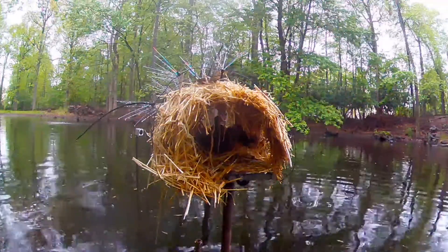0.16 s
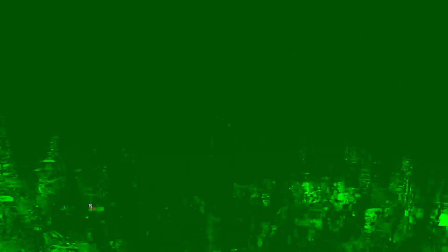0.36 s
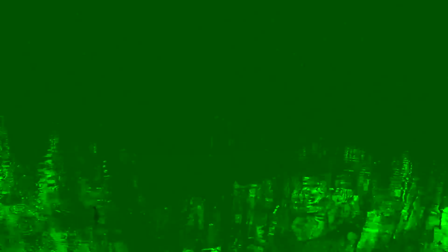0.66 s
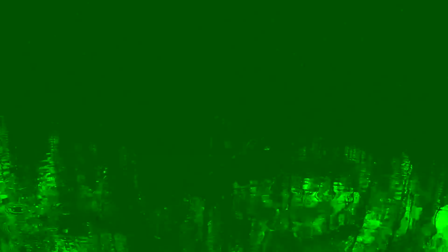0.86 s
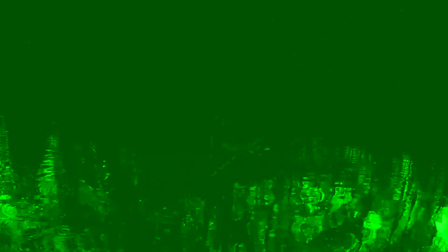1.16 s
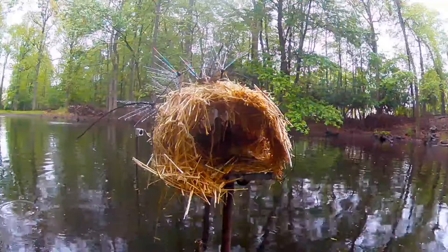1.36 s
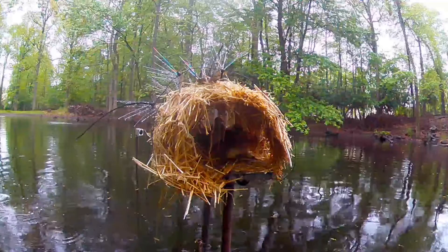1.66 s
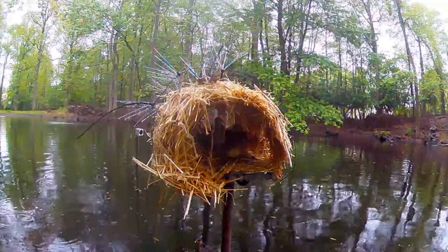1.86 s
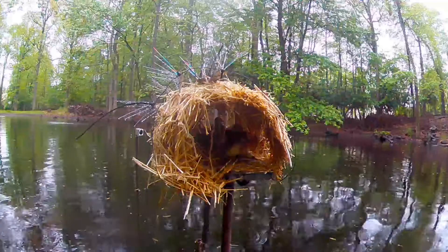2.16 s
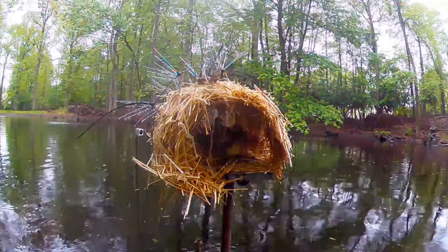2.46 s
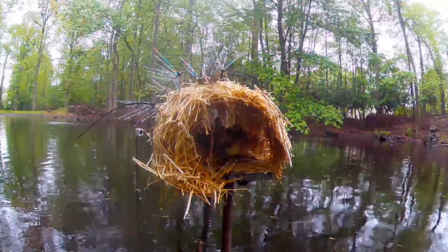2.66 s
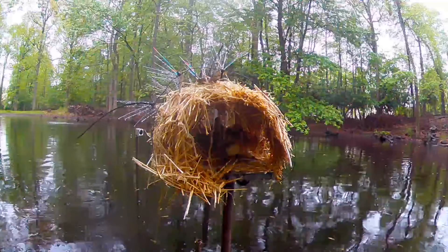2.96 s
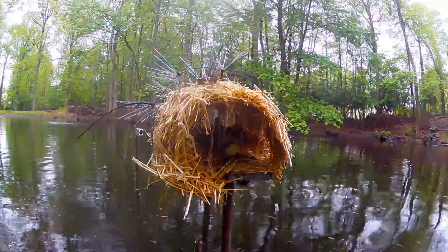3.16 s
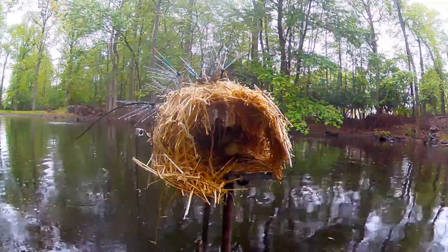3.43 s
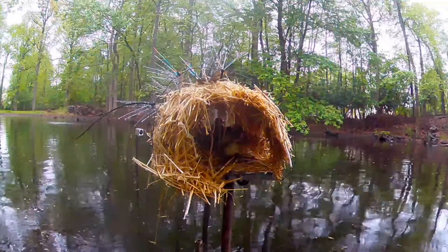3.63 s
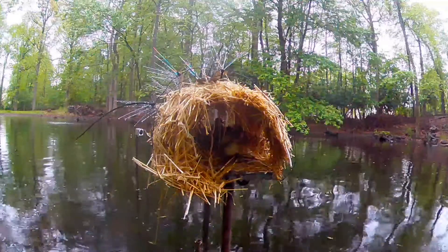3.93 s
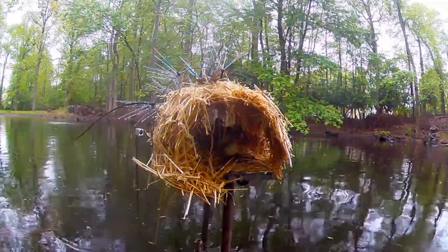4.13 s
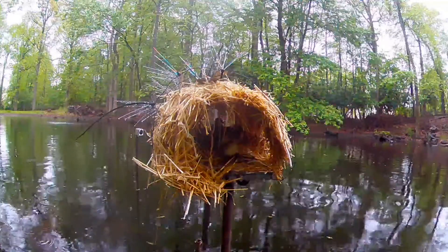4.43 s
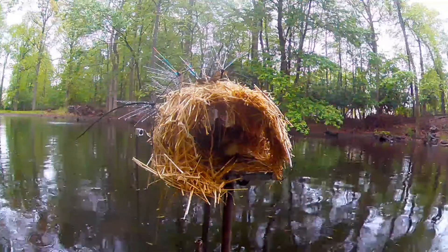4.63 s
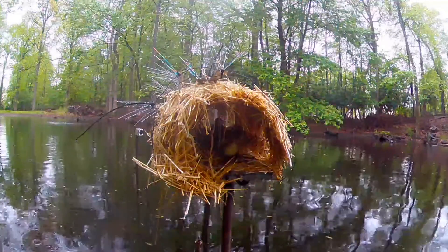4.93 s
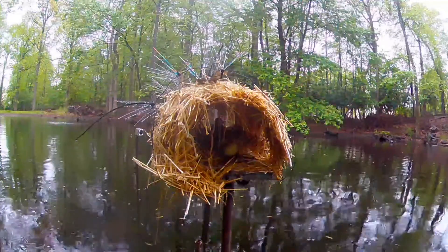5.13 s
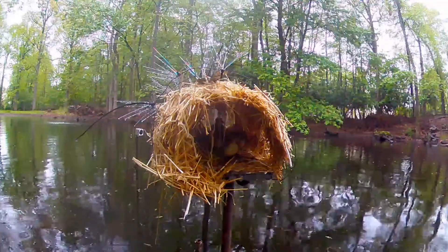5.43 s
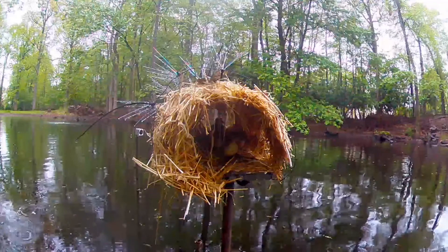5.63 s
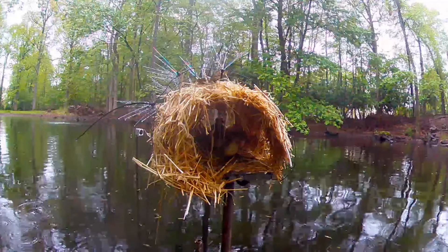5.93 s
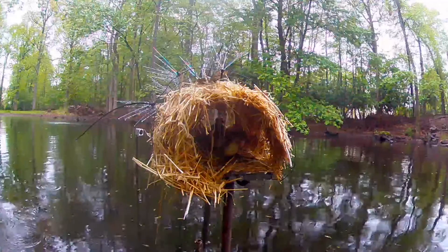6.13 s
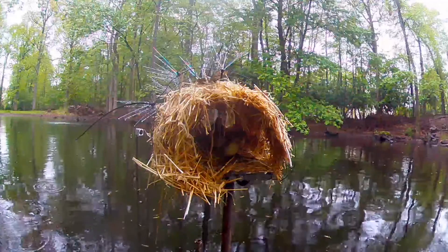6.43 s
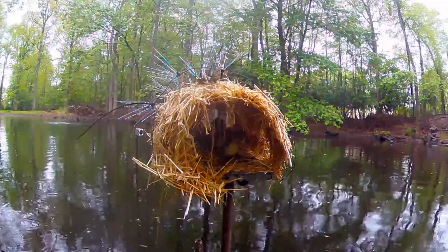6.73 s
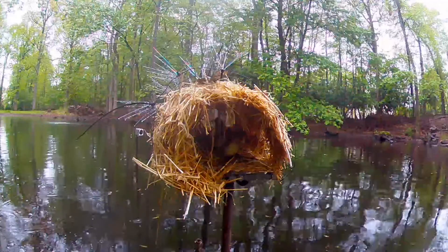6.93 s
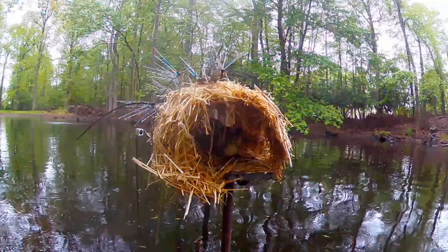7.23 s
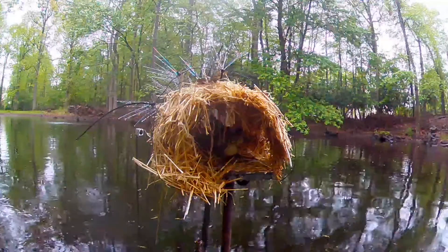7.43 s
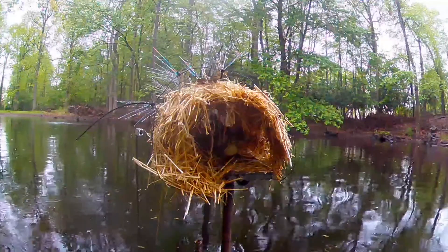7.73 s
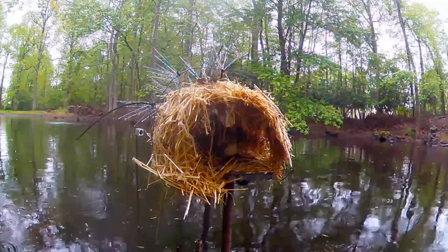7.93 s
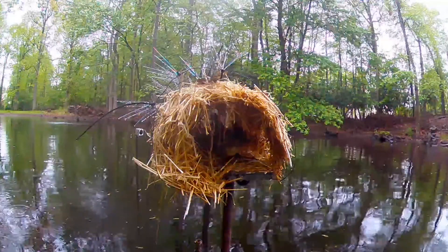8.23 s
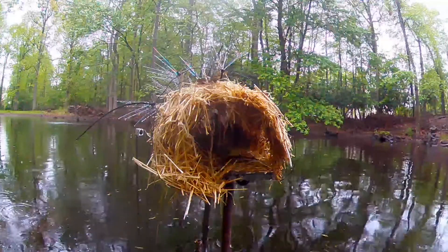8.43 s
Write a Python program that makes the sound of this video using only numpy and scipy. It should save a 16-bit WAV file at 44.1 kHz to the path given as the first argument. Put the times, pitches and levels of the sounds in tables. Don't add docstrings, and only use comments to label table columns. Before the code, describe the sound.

A steady quiet bed of woodland hiss and a faint low hum near 150 Hz, beating slowly, lasts about 8.5 seconds. Faint peeps open the scene with a weak distant hen rasp; from 0.5 seconds bright duckling whistles near 4.7 kHz arrive several times a second, each under a tenth of a second, scooping upward, some cracking into short breathy rattles. The hen rasps softly around 1.6 to 2.1. Quick blips cluster at 3.2 to 3.7 and 4.0 to 4.5, where dry, pulsed hen rasps answer until 4.9. Peeps thin out, with a brief stronger group near 6.0, then softer notes around 4.1 kHz at 6.4, 6.7, 7.0 and 7.3. Faint peeps and hen rasps at 6.8 and 7.8 to 8.45 finish. Throughout, 20-millisecond repeats cause stutters, splices and clicks; treble is dull above 7 kHz, with thin echo from trees.

```python
import sys
import numpy as np
from scipy import signal
from scipy.io import wavfile
from scipy.ndimage import uniform_filter1d

SR = 44100
rng = np.random.default_rng(int(sys.argv[2]) if len(sys.argv) > 2 else 0)


def transcribe(signal):
    frames = np.atleast_2d(signal).T
    limited = np.clip(frames, -1, 1)
    pcm = np.round(limited * 32767).astype(np.int16)
    wavfile.write(sys.argv[1], SR, pcm)


def volts_from_decibels(level):
    exponent = np.asarray(level, float) / 20
    return 10 ** exponent


N = 378378

# frequency in Hz, level in dB rms.
HUM_TONES = [(149.77, -69.5), (148.71, -74), (300, -84)]
HUM_IN_STEP_S = 4.1
# frequency in Hz, density in dB per Hz.
WOODS_SPECTRUM = [(15, -47), (25, -11.5), (96, -7.5), (152, -4), (224, -10.5), (371, -8.5), (1020, -19),
                  (1540, -17), (2150, -12.5), (3320, -16), (4650, -14.5), (6670, -19), (7900, -23),
                  (10300, -64.5), (17400, -120)]
WOODS_LEVEL_DB = -64

# start in seconds, length in seconds, first level in dB, last level in dB.
RASPS = [(0, .1, -60, -72), (.24, .12, -67, -77), (1.6, .2, -63, -58), (1.77, .18, -60, -61),
         (1.92, .22, -63, -66), (4.11, .25, -56, -59), (4.37, .14, -48, -54), (4.515, .135, -57, -55.5),
         (4.775, .11, -52, -60), (6.755, .17, -50.5, -48), (7.788, .21, -55, -52),
         (8.045, .155, -51, -51.5), (8.29, .16, -50.5, -48.5)]
# frequency in Hz, width in Hz, level in dB.
THROAT_MODES = [(2157, 240, 5), (2380, 260, -7), (2620, 1200, -17), (1998, 490, -13), (5830, 1100, -20)]
RASP_ATTACK_S, RASP_RELEASE_S, RASP_EDGE_DB = .022, .05, 22

# start in seconds, length in seconds, level in
# dB.
RATTLES = [(3.2205, .002, -41), (6.106, .003, -46), (5.536, .002, -45), (5.5445, .002, -49),
           (5.556, .002, -50), (1.488, .016, -47), (2.906, .008, -50), (.882, .05, -47), (1.128, .035, -45),
           (1.466, .03, -48), (2.03, .025, -46), (2.356, .02, -48), (2.68, .05, -46), (2.99, .06, -44),
           (3.302, .035, -46), (3.665, .02, -48), (3.995, .01, -50), (4.082, .04, -45), (4.466, .06, -47),
           (5.695, .025, -52), (6.066, .025, -54), (6.462, .03, -52), (6.77, .02, -51), (7.405, .03, -55),
           (7.78, .025, -52), (.5, .02, -50)]
RATTLE_HZ, RATTLE_SAG_HZ, RATTLE_WIDTH_HZ, RATTLE_FADE_DB = 5200, 1100, 1300, 8

# start in seconds, length in seconds, first pitch in Hz, last pitch in Hz, level in dB.
HELD_PEEPS = [(.512, .075, 4540, 4575, -30.5), (.516, .074, 4850, 4770, -39), (.79, .089, 4600, 4690, -29),
              (.795, .045, 4890, 4800, -40), (2.278, .034, 4935, 4935, -48), (5.996, .048, 4650, 4650, -33),
              (6.045, .025, 4650, 4650, -33), (1.05, .075, 4660, 4650, -32), (1.058, .048, 4810, 4800, -35),
              (1.128, .03, 4830, 4750, -45), (1.307, .102, 4820, 4650, -34), (1.408, .05, 4860, 4860, -33),
              (1.572, .099, 4800, 4600, -32), (1.857, .09, 4800, 4600, -33), (1.945, .089, 4700, 4740, -39),
              (2.136, .091, 4790, 4640, -33), (2.27, .042, 4680, 4710, -33), (2.588, .054, 4660, 4700, -33),
              (2.628, .05, 4750, 4850, -43), (2.922, .074, 4780, 4900, -33), (3.584, .078, 4760, 4800, -42),
              (4.412, .045, 4700, 4750, -43), (5.642, .048, 4760, 4750, -40),
              (6.108, .072, 4070, 3970, -44)]
# start in seconds, length in seconds, first pitch in Hz, last pitch in Hz, level in dB.
BURST_PEEPS = [(2.362, .02, 4800, 4750, -41), (3.203, .025, 4350, 4400, -43), (5.074, .07, 4230, 4420, -41),
               (5.376, .05, 4620, 4540, -38), (6.383, .094, 4130, 4030, -41),
               (6.689, .1, 4130, 4050, -41.5), (7.002, .1, 4170, 4070, -41.5),
               (7.313, .1, 4060, 4220, -43.5), (7.463, .027, 4580, 4580, -51)]
# start in seconds, length in seconds, first pitch in Hz, last pitch in Hz, level in dB.
SWELL_PEEPS = [(.305, .042, 3960, 4000, -47), (5.413, .046, 4560, 4680, -36),
               (2.82, .065, 5150, 5090, -51.5), (3.243, .055, 4670, 4750, -40)]
# start in seconds, length in seconds,
# first pitch in Hz, last pitch in Hz, level in dB.
FAINT_PEEPS = [(7.968, .072, 4250, 4080, -53), (3.69, .05, 4780, 4750, -55), (3.36, .06, 4850, 4800, -60),
               (.058, .045, 3800, 3680, -55), (.185, .045, 3350, 3250, -62), (.245, .055, 4430, 4350, -52),
               (.41, .1, 5020, 4980, -57), (.695, .03, 5450, 5100, -56), (.745, .055, 5020, 4950, -52),
               (1.041, .014, 4700, 4700, -42), (2.543, .057, 5080, 5100, -50),
               (3.185, .058, 5090, 5080, -49), (2.308, .044, 4750, 4780, -46), (4.12, .14, 4780, 4770, -61),
               (4.29, .09, 5180, 5100, -60), (4.31, .053, 4160, 4160, -61), (4.625, .11, 5110, 5060, -57),
               (4.78, .055, 3700, 3480, -54), (4.928, .02, 5300, 5150, -65),
               (5.807, .065, 4150, 3760, -55.5), (5.87, .06, 3750, 3750, -58), (5.69, .04, 4750, 4840, -55),
               (7.342, .048, 4770, 4720, -50), (7.6, .05, 4400, 4150, -54), (7.597, .06, 4900, 4600, -51),
               (7.659, .065, 4320, 4160, -48), (7.737, .047, 4800, 4790, -45),
               (7.857, .063, 4700, 4730, -51), (7.865, .09, 6300, 6100, -66), (4.73, .06, 5080, 5080, -63),
               (8.095, .14, 4880, 4900, -56), (4.038, .027, 4780, 4760, -51), (8.357, .06, 4790, 4740, -46),
               (8.43, .075, 4780, 4750, -57), (8.445, .055, 3900, 3900, -64)]
# start in seconds, length in seconds, first pitch in Hz, last pitch in Hz, level in dB.
SLIDES = [(.044, .012, 4250, 4000, -57), (.352, .009, 4250, 4350, -47), (.504, .012, 4030, 4030, -49),
          (1.671, .009, 4700, 3700, -50), (2.052, .012, 4400, 3650, -48), (2.127, .006, 3900, 4700, -54),
          (2.229, .008, 4800, 3800, -52), (3.298, .01, 4900, 4300, -42), (3.331, .011, 4700, 3800, -43),
          (4.085, .008, 4600, 4100, -49), (4.108, .016, 4600, 3700, -55), (2.9, .005, 4640, 4640, -33),
          (6.462, .016, 3950, 3850, -47), (6.768, .016, 4100, 3800, -48), (.312, .022, 3850, 3500, -53),
          (8.04, .016, 4080, 3850, -52), (4.75, .037, 4700, 3750, -60), (5.04, .035, 5050, 4500, -60),
          (5.05, .028, 3980, 4200, -57), (5.366, .012, 5300, 4900, -59), (6.37, .01, 4000, 4300, -57),
          (5.615, .015, 5220, 4800, -48)]
# start in seconds, length in seconds, first pitch in Hz, last pitch in Hz, level in dB.
BLIPS = [(7.964, .045, 4260, 4200, -47), (2.682, .01, 4650, 4600, -41), (3.011, .014, 4600, 4000, -39),
         (2.031, .012, 4750, 4550, -40), (6.09, .016, 4070, 4050, -43), (2.35, .015, 4900, 4850, -34),
         (2.671, .011, 4930, 4880, -35), (3.288, .016, 4880, 4950, -32), (3.3, .007, 4750, 4600, -38),
         (3.59, .009, 4660, 4700, -37), (3.659, .007, 4850, 4850, -31), (4.001, .01, 4500, 4720, -36),
         (4.012, .016, 4800, 4780, -37.5), (4.028, .012, 4780, 4770, -43), (4.067, .009, 4780, 4800, -40),
         (4.075, .008, 4900, 4900, -32), (4.082, .006, 4720, 4600, -36), (4.383, .038, 4680, 4680, -29.5),
         (4.453, .009, 4950, 4950, -32), (4.461, .007, 4750, 4500, -33), (1.455, .016, 4830, 4850, -33),
         (7.082, .02, 4350, 4250, -47), (7.101, .012, 4350, 4200, -43), (7.83, .013, 4800, 4800, -49),
         (1.148, .009, 4850, 4750, -38), (1.157, .006, 4600, 4300, -43), (5.625, .024, 4800, 4780, -39),
         (7.718, .01, 4350, 4200, -48), (6.066, .007, 4700, 4500, -47), (1.465, .007, 4700, 4500, -37)]
# attack in seconds, rise in dB, scoop in Hz, change over the hold in dB,
# release in seconds, fall in dB. Attack and release squeeze to fit short peeps.
HELD_SHAPE = (.014, 10, 150, -.3, .018, 14)
BURST_SHAPE = (.006, 16, 80, -4, .022, 14)
SWELL_SHAPE = (.008, 5, 30, 7, .022, 14)
FAINT_SHAPE = (.006, 2.5, 5, -3, .015, 3)
SLIDE_SHAPE = (.001, 1.2, 5, -2.5, .001, 1.2)
BLIP_SHAPE = (1, 13, 40, 0, 1, 13)

BLOCK_S, FIRST_BLOCK_S, TURN_SAMPLES, TURN_BLOCKS = .0005, .00023, 882, 40
# valid from in seconds, block of 40 where a turn begins.
TURN_STARTS = [(0, 27), (.37, 22), (5.53, 14)]
# start in seconds, count of blocks, count of turns.
STUCK_BLOCKS = [(.8852, 1, 6), (.9332, 8, 4), (1.1712, 20, 2), (2.7252, 1, 4), (4.4852, 1, 6),
                (5.4852, 1, 3), (6.0812, 1, 3), (1.5057, 1, 1), (1.4917, 3, 1), (1.5112, 18, 1),
                (5.1652, 1, 1), (7.3272, 1, 1)]
# start in seconds, length in ms.
STALLS = [(.3327, 11), (.5252, 36), (.5852, 36), (1.0452, 25.5), (1.3052, 16), (1.3512, 39.5), (1.9512, 10),
          (2.0712, 9), (2.1452, 16), (2.1912, 19.5), (2.3052, 25.5), (2.5852, 16), (2.6312, 39.5),
          (2.8912, 10), (2.9512, 39.5), (3.0252, 16), (3.2112, 29.5), (3.6112, 19.5), (4.3652, 15.5),
          (4.4312, 10), (5.0857, 15.5), (5.1252, 36), (5.9712, 26), (5.3912, 30), (5.4512, 30),
          (5.6472, 19.5), (6.0272, 30), (6.1072, 10), (1.5712, 10), (6.1612, 25.5), (6.4072, 30),
          (6.7272, 39.5), (7.0472, 41), (7.3672, 39.5), (7.6272, 30), (7.7672, 14), (7.6872, 10),
          (7.7072, 19.5), (7.8872, 10), (7.9072, 10), (8.0412, 6), (8.0872, 10), (4.9512, 30)]
# start in seconds, length in ms.
SETTING_IN = [(.7712, 39.5), (.8307, 50.5), (1.0912, 39.5), (1.4107, 30.5), (1.9917, 19.5), (2.3687, 41),
              (2.6912, 28), (3.2712, 19.5), (3.6512, 37.5), (6.4672, 39.5), (6.7872, 38), (6.8612, 36),
              (6.6712, 26), (6.9912, 26), (7.3112, 26), (8.3357, 29), (8.3872, 39.5)]
# start in seconds, length in ms.
RAGGED = [(.5142, 4), (1.1512, 10), (2.4317, 8.5), (2.7252, 7), (3.0452, 5.5), (4.5112, 9), (4.5522, 38.5),
          (4.6112, 9.5), (5.5127, 5.5), (5.6017, 15), (6.2072, 8.5), (7.1072, 40), (7.8272, 10),
          (7.8472, 10), (8.1272, 50), (8.4472, 8)]
SET_IN_MS, OLD_SHARE = 10, .7
# start in seconds, length in ms.
PATCHY_RUNS = [(0.5062, 1.0), (0.5112, 1.5), (0.5142, 1.5), (0.5167, 2.0), (0.5192, 0.5), (0.5252, 3.5),
               (0.5457, 5.0), (0.5517, 3.5), (0.5557, 5.5), (0.5857, 0.5), (0.6052, 3.5), (0.8057, 4.5),
               (1.1052, 3.5), (1.3452, 1.0), (0.8312, 2.0), (0.8337, 0.5), (0.8347, 0.5), (0.8357, 0.5),
               (0.8377, 0.5), (0.8452, 4.5), (0.8502, 0.5), (0.8652, 4.5), (0.8702, 0.5), (1.0657, 4.0),
               (1.0702, 0.5), (1.0912, 3.5), (1.0957, 1.0), (1.0977, 1.5), (1.0997, 0.5), (1.1112, 3.5),
               (1.1157, 5.5), (1.1522, 1.0), (1.1562, 0.5), (1.1597, 0.5), (1.1652, 1.5), (1.3652, 4.5),
               (1.4112, 1.5), (1.4137, 0.5), (1.4147, 1.5), (1.4177, 0.5), (1.4257, 5.0), (1.4452, 3.5),
               (1.4497, 1.0), (1.4717, 1.5), (1.4852, 1.0), (1.9852, 1.0), (1.9917, 3.5),
               (1.9957, 1.5), (1.9977, 0.5), (1.9987, 1.0), (2.1517, 0.5), (2.1527, 8.5), (2.1857, 0.5),
                 (2.3052, 1.0), (2.3252, 1.0), (2.3687, 1.0), (2.3712, 2.5), (2.3742, 1.0), (2.3762, 0.5),
                 (2.3772, 1.0), (2.3787, 1.5), (2.3852, 5.0), (2.4052, 4.5), (2.6252, 1.0), (2.6452, 4.5),
                 (2.6502, 0.5), (2.6917, 1.0), (2.6962, 1.5), (2.6982, 1.0), (2.7252, 4.5), (2.7302, 0.5),
                 (2.9057, 5.0), (2.9452, 1.0), (2.9852, 4.5), (2.9902, 0.5), (3.0052, 0.5), (3.0117, 0.5),
                 (3.0127, 0.5), (3.0252, 4.0), (3.0297, 1.0), (3.2052, 0.5), (3.2067, 0.5), (3.2252, 4.5),
                 (3.2302, 1.0), (3.2712, 3.0), (3.2747, 1.0), (3.2772, 0.5), (3.2782, 1.0), (3.2797, 0.5),
                 (3.6257, 5.0), (3.6462, 4.5), (3.6512, 2.0), (3.6547, 0.5), (3.6557, 0.5), (3.6577, 0.5),
               (3.6602, 0.5), (3.6657, 5.0), (3.6857, 3.0), (4.4252, 1.0), (5.1142, 0.5), (5.3857, 0.5),
               (5.4452, 0.5), (5.6612, 4.5), (6.0212, 0.5), (5.6662, 0.5), (6.0412, 4.5), (6.0462, 0.5),
               (6.0812, 0.5), (6.0852, 1.0), (6.1212, 3.5), (6.1612, 4.5), (6.1662, 0.5), (6.4012, 1.0),
               (6.4052, 0.5), (6.4217, 5.0), (6.4417, 3.0), (6.4467, 0.5), (6.4617, 0.5), (6.4672, 1.5),
               (6.4697, 1.0), (6.4732, 2.0), (6.4757, 0.5), (6.7172, 1.5), (6.7212, 1.0), (6.8612, 1.0),
               (7.0417, 0.5), (7.0617, 5.0), (7.0872, 1.0), (7.0932, 0.5), (7.1072, 4.0), (7.1117, 1.0),
               (7.1142, 2.0), (7.3612, 1.0), (8.3872, 2.5), (8.3902, 2.5), (8.3947, 1.5), (8.4012, 4.5),
               (8.4062, 0.5)]
# start in seconds, end in seconds.
SOUND_SPANS = [(2.085, 2.14), (4.6, 4.74), (4.985, 5.04), (5.53, 5.6), (.115, .18), (.24, .33),
               (4.845, 4.95), (4.28, 4.36), (1.525, 1.56), (.36, .42), (.62, .7), (1.0, 1.04), (1.2, 1.3),
               (2.79, 2.82), (1.59, 1.94), (2.22, 2.3), (3.3, 3.6), (3.89, 3.99), (4.13, 4.24),
               (4.74, 4.82), (5.17, 5.22), (5.7, 5.87), (3.16, 3.2), (7.79, 7.83), (6.3, 6.4), (7.42, 7.55),
               (7.59, 7.62), (7.7, 7.76), (7.93, 8.07), (8.2, 8.33)]


def evened(x):
    return x / np.sqrt(np.mean(x ** 2) + 1e-20)


def add(mix, start_s, sound):
    part = mix[max(round(start_s * SR), 0):][:len(sound)]
    part += sound[:len(part)]


def drift(size, width):
    chance = rng.standard_normal(8192 * (size // 8192 + 1))
    smooth = uniform_filter1d(uniform_filter1d(chance, width), width)
    return evened(smooth)[:size]


def ring(x, hz, width_hz):
    radius = np.exp(-np.pi * width_hz / SR)
    pole = radius * np.exp(2j * np.pi * hz / SR)
    return 2 * signal.lfilter([1 - radius], [1, -pole], x).real


def hum():
    t = np.arange(N) / SR - HUM_IN_STEP_S
    return sum(np.sqrt(2) * volts_from_decibels(db) * np.cos(2 * np.pi * hz * t) for hz, db in HUM_TONES)


def woods():
    frames = N // 256 + 5
    hz = np.fft.rfftfreq(1024, 1 / SR)
    real, imag, patches = rng.standard_normal((frames, 513, 3)).T
    patches = uniform_filter1d(patches, 10, axis=0)
    patches = evened(uniform_filter1d(patches, 16, axis=1))
    table_hz, table_db = np.transpose(WOODS_SPECTRUM)
    colour_db = np.interp(np.log(hz + 1), np.log(table_hz + 1), table_db)[:, None]
    level_db = colour_db + 1.5 * patches + 1.1 * drift(frames, 40)
    spectra = (real + 1j * imag) * volts_from_decibels(level_db)
    hiss = signal.istft(spectra, nperseg=1024, noverlap=768)[1][:N]
    return volts_from_decibels(WOODS_LEVEL_DB) * evened(hiss)


def trees(x):
    t60_s, gap_s = .8, .02
    t = np.arange(SR) / SR
    scatter = rng.standard_normal(SR) * (rng.random(SR) < .05)
    tail = scatter * volts_from_decibels(-60 * t / t60_s) * (t > gap_s)
    return signal.fftconvolve(x, tail / np.linalg.norm(tail))[:N]


def rasp(start_s, length_s, first_db, last_db):
    pulse_hz, jitter = 180, .15
    corner_s = [0, RASP_ATTACK_S, length_s - RASP_RELEASE_S, length_s]
    corner_db = [first_db - RASP_EDGE_DB, first_db, last_db, last_db - RASP_EDGE_DB]
    t = np.arange(0, length_s, 1 / SR)
    size, breath = rng.standard_normal((2, SR))[:, :len(t)]
    cycles = np.cumsum(pulse_hz * (1 + jitter * drift(len(t), 150))) / SR
    pulses = np.diff(np.floor(cycles), prepend=0) * volts_from_decibels(1.6 * size)
    drive = evened(pulses) + .45 * breath
    throat = sum(volts_from_decibels(db) * ring(ring(drive, hz, width), hz, 2 * width) for hz, width, db in THROAT_MODES)
    level = volts_from_decibels(np.interp(t, corner_s, corner_db))
    return start_s, level * evened(throat) * signal.windows.tukey(len(t), .08)


def rattle(start_s, length_s, db):
    t = np.arange(0, length_s, 1 / SR)
    breath = rng.standard_normal(SR // 10)[:len(t)] * volts_from_decibels(5 * drift(len(t), 50))

    def beak(hz):
        return evened(ring(ring(breath, hz, RATTLE_WIDTH_HZ), hz, RATTLE_WIDTH_HZ))

    sink = np.pi / 2 * t / length_s
    sound = beak(RATTLE_HZ) * np.cos(sink) + beak(RATTLE_HZ - RATTLE_SAG_HZ) * np.sin(sink)
    level = volts_from_decibels(db - 3 - RATTLE_FADE_DB * t / length_s)
    return start_s, level * sound * signal.windows.tukey(len(t), .3)


def shaped(start_s, length_s, first_hz, last_hz, db, attack_s, rise_db, scoop_hz, change_db, release_s, fall_db):
    squeeze = min(1, .9 * length_s / (attack_s + release_s))
    end_s = start_s + length_s
    early_db = db - max(change_db, 0)
    late_db = db + min(change_db, 0)
    return [(start_s, first_hz - scoop_hz, early_db - rise_db),
            (start_s + squeeze * attack_s, first_hz, early_db),
            (end_s - squeeze * release_s, last_hz, late_db),
            (end_s, last_hz + scoop_hz, late_db - fall_db)]


def peep(corners):
    octave_db, far_db, fuzz_per_db, crack = -30, -42, .04, .32
    s, hz, db = np.transpose(corners)
    t = np.arange(s[0] - .002, s[-1] + .005, 1 / SR)
    pitch_hz = uniform_filter1d(np.interp(t, s, hz), 100)
    phase = 2 * np.pi * np.cumsum(pitch_hz * (1 + .003 * drift(len(t), 200))) / SR
    edge = np.clip((t - t[0]) / .003, 0, 1) * np.clip((t[-1] - t) / .006, 0, 1)
    grain = fuzz_per_db * max(far_db - db.max(), 0) * drift(len(t), 80)
    glide = np.minimum(np.gradient(pitch_hz) ** 2, 1)
    rough = grain + crack * glide * drift(len(t), 12)
    level = volts_from_decibels(np.interp(t, s, db) + .6 * drift(len(t), 200)) * edge * (1 + rough)
    whistle = np.sin(phase) + volts_from_decibels(octave_db) * np.sin(2 * phase)
    return t[0], np.sqrt(2) * level * whistle


def scene():
    near, far, hen = np.zeros((3, N))
    kinds = [(HELD_PEEPS, HELD_SHAPE), (BURST_PEEPS, BURST_SHAPE), (SWELL_PEEPS, SWELL_SHAPE),
             (FAINT_PEEPS, FAINT_SHAPE), (SLIDES, SLIDE_SHAPE), (BLIPS, BLIP_SHAPE)]
    for rows, shape in kinds:
        for row in rows:
            place = near if row[-1] > -45.5 else far
            add(place, *peep(shaped(*row, *shape)))
    for row in RATTLES:
        add(near, *rattle(*row))
    for row in RASPS:
        add(hen, *rasp(*row))
    echoes = trees(volts_from_decibels(-25) * near + volts_from_decibels(-15) * far + volts_from_decibels(-13) * hen)
    return (near + far + hen + echoes + woods() + hum())[None]


def missed_blocks(x):
    at = np.arange(int(N / SR / BLOCK_S) + 1)
    s = at * BLOCK_S + FIRST_BLOCK_S
    since_s, first = np.transpose(TURN_STARTS)
    place = at - first[np.searchsorted(since_s, s) - 1].astype(int) + TURN_BLOCKS
    turn, slot = place // TURN_BLOCKS, place % TURN_BLOCKS
    luck = rng.random((at[-1] // TURN_BLOCKS + 3, 3))
    flicker = rng.random(len(at))
    long_part = slot < 20
    short_part = (slot > 27) & (slot < 39)

    share = np.zeros(len(at))
    for table, ragged_ms in [(STALLS, 0), (SETTING_IN, SET_IN_MS), (RAGGED, np.inf)]:
        for start_s, ms in table:
            tail = share[round(start_s / BLOCK_S):]
            tail[:round(2 * ms)] = 1
            tail[:round(2 * min(ms, ragged_ms))] = OLD_SHARE
    listed = (flicker < share) & (long_part | short_part)

    runs = PATCHY_RUNS
    patchy_halves = [place[round(start_s / BLOCK_S)] // 20 for start_s, ms in runs]
    listed &= ~np.isin(place // 20, patchy_halves)
    for start_s, ms in runs:
        listed[round(start_s / BLOCK_S):][:round(2 * ms)] = True
    for start_s, blocks, turns in STUCK_BLOCKS:
        repeats = np.add.outer(TURN_BLOCKS * np.arange(turns), np.arange(blocks))
        listed[round(start_s / BLOCK_S) + repeats] = True

    slips = long_part & (luck[turn, 0] < .55) | short_part & (luck[turn, 1] < .45)
    slips &= flicker < np.where(luck[turn, 2] < .5, 1, .65)
    power = uniform_filter1d(x ** 2, 1500)[np.minimum((s * SR).astype(int), N - 1)]
    lull = (power < volts_from_decibels(2 * -49)) & (share == 0)
    slips &= lull & np.roll(lull, TURN_BLOCKS)
    for start_s, end_s in SOUND_SPANS:
        slips &= (s < start_s) | (s > end_s)
    return listed | slips


def top_cut(x):
    return signal.sosfilt(signal.butter(12, 8190, fs=SR, output="sos"), x)


def record(dry):
    block = np.maximum((np.arange(N) / SR - FIRST_BLOCK_S) // BLOCK_S, 0).astype(int)
    old = missed_blocks(dry[0])[block]
    source = np.arange(N)
    for i in range(TURN_SAMPLES, N, TURN_SAMPLES):
        now = slice(i, min(i + TURN_SAMPLES, N))
        before = source[now.start - TURN_SAMPLES:now.stop - TURN_SAMPLES]
        source[now] = np.where(old[now], before, source[now])
    band_limit = signal.firwin(61, 7200, window=("kaiser", 7), fs=SR)
    mix = signal.oaconvolve(dry[:, source], band_limit[None], "same")
    return top_cut(mix)


dry = scene()
out = record(dry)
transcribe(out)
```